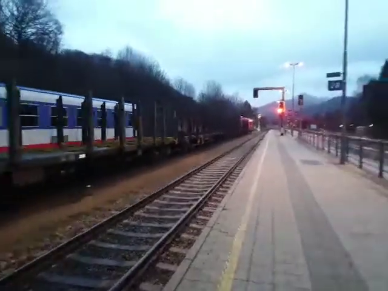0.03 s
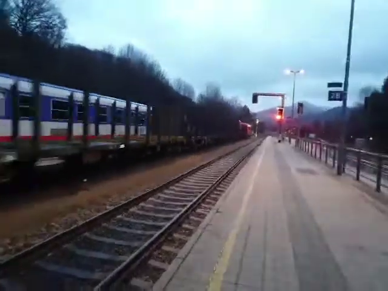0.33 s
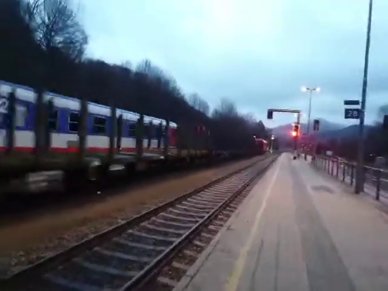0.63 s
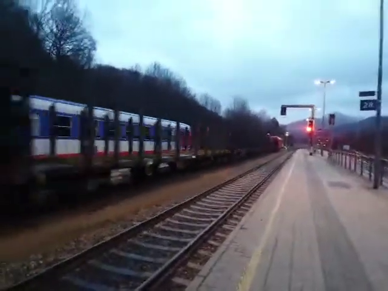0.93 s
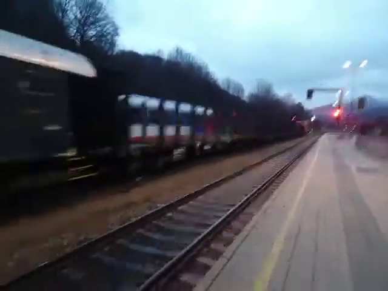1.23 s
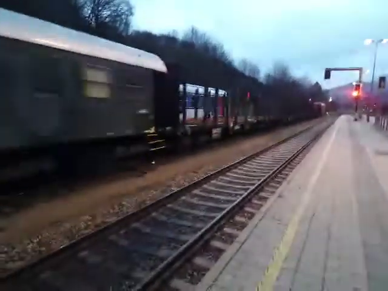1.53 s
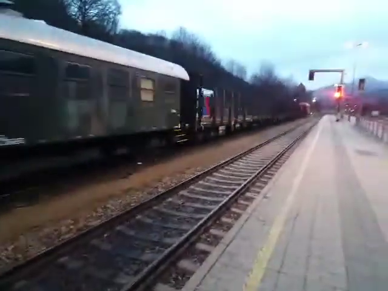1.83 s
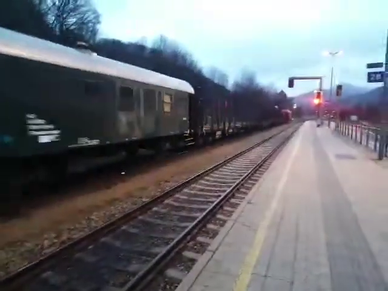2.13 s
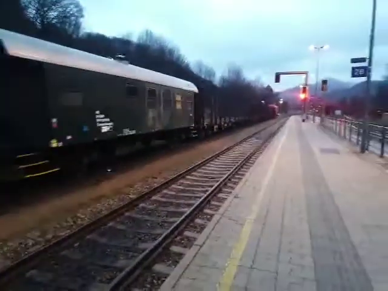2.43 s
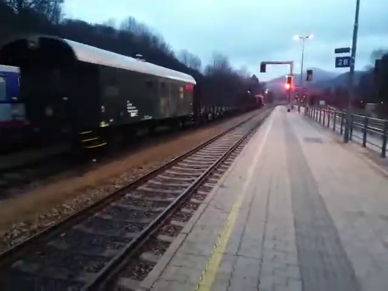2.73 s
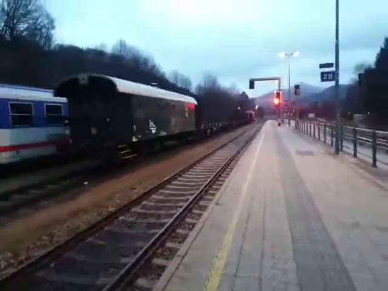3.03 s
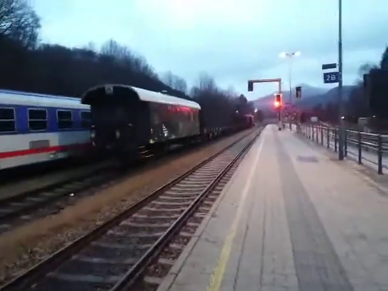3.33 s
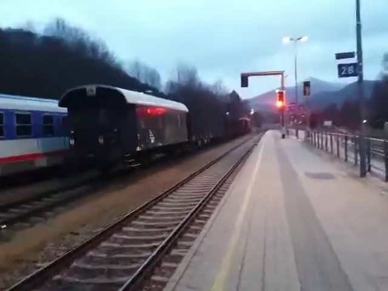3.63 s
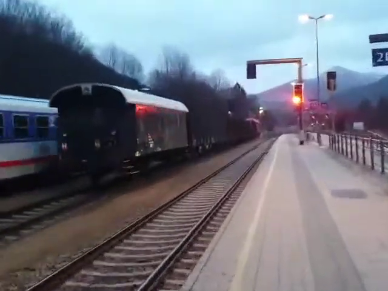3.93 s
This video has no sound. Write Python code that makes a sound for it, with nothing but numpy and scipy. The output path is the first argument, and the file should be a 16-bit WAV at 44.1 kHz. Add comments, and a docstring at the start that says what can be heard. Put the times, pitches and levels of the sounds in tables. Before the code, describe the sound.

A freight train rolls by and away, rumbling, clacking and squeaking lightly.

```python
"""A station platform, two tracks from a freight train whose last wagons roll past the microphone and away.
The wagon bodies rumble, wheels and rails hiss and ring under the rolling contact, and a flat spot
thumps about three times a second. The jolts shake loose steel fittings; now and then a flange squeaks
or a tread scrapes. The closing van's wheels ring out last, and light air moves on the microphone."""
import sys
import numpy as np
from scipy import signal
from scipy.fft import rfft, irfft
from scipy.io import wavfile
from scipy.ndimage import map_coordinates

SR = 44100
rng = np.random.default_rng(int(sys.argv[2]) if len(sys.argv) > 2 else 0)


def digitize_waveform(pressure):
    """Quantize a signal to 16-bit integers and store it at the path in sys.argv[1].

    Rows of a 2-D input are taken as channels; values are limited to [-1, 1].
    """
    field = np.atleast_2d(pressure).T
    bounded = np.clip(field, -1, 1)
    quanta = np.round(bounded * 32767).astype(np.int16)
    wavfile.write(sys.argv[1], SR, quanta)


N = 176400
T = np.arange(N) / SR


def from_db(db):
    """Decibels to gain."""
    return 10 ** (np.asarray(db) / 20)


def rms_one(x):
    """Scale to unit power."""
    return x / np.sqrt(np.mean(x ** 2) + 1e-20)


def level(rows):
    """Gain over time from (t/s, level/dB) points."""
    return from_db(np.interp(T, *np.transpose(rows)))


def coloured(x, spectrum):
    """Shape a steady signal by (f/Hz, level/dB) points; unit power."""
    hz, db = np.transpose(spectrum)
    f = np.maximum(np.fft.rfftfreq(N, 1 / SR), 1)
    gain = from_db(np.interp(np.log(f), np.log(hz), db)) / (1 + (f / hz[-1] / 2) ** 2)
    return rms_one(irfft(rfft(x) * gain, N))


def noise(spectrum):
    """Coloured noise of unit power."""
    return coloured(rng.standard_normal(N), spectrum)


def drift(rate_hz):
    """Slow random wander of spread 1."""
    f = np.fft.rfftfreq(N, 1 / SR)
    return rms_one(irfft(rfft(rng.standard_normal(N)) / (1 + (f / rate_hz) ** 2), N))


def clicks_at(times, db):
    """One click at each time."""
    clicks = np.zeros(N)
    clicks[(times * SR).astype(int)] = from_db(db)
    return clicks


def swell(peak_s, rise_s, fall_s):
    """Exponential rise to a peak, then an exponential fall."""
    return np.exp(-np.abs(T - peak_s) / np.where(T < peak_s, rise_s, fall_s))


def ring(x, hz, t60):
    """One mode: a unit click leaves a dying sine of height 1."""
    radius = from_db(-60 / (t60 * SR))
    angle = 2 * np.pi * min(hz, .45 * SR) / SR
    return signal.lfilter([0, np.sin(angle)], [1, -2 * radius * np.cos(angle), radius ** 2], x + 1e-18)


def sing(hz, width_hz):
    """A resonance kept ringing by rough contact; unit power."""
    t60 = np.log(1000) / (np.pi * width_hz)
    return rms_one(ring(ring(rng.standard_normal(N), hz, t60), hz, t60 / 10))


def ringing(modes, waver_db):
    """Modes kept ringing by the rolling, each wavering on its own; unit power."""
    return rms_one(sum(from_db(db + waver_db * drift(13)) * sing(hz, width) for hz, width, db in modes))


# spectrum of the air on the microphone (f/Hz, relative level/dB)
AIR_SPECTRUM = [(20, -4), (60, 14), (130, -19), (400, -44)]
def breeze():
    """Light air on the microphone: a faint low flutter, different on each side."""
    return from_db(-45) * np.array([noise(AIR_SPECTRUM) for _ in range(2)])


# spectrum of the rumble underfoot (f/Hz, relative level/dB)
GROUND_SPECTRUM = [(20, -24), (38, -14), (52, 2.5), (70, -10.5), (100, -2), (130, -7.5), (170, -19),
                   (400, -60)]
def ground_rumble(start_db=-31, fade_db_per_s=2.93):
    """The whole train's deep rumble carries far through the ground, fading slowly."""
    return from_db(start_db - fade_db_per_s * T) * noise(GROUND_SPECTRUM)


# rumble of the wagon bodies, two tracks off (f/Hz, relative level/dB) and its course (t/s, level/dB)
RUMBLE_SPECTRUM = [(20, -37), (38, -28), (52, -2.5), (70, 7), (90, 0.5), (128, -1), (165, 4), (222, 1),
                   (275, -4.5), (330, -6), (460, -16), (610, -18), (780, -21), (950, -26.5), (1300, -26.5),
                   (2500, -40.5)]
RUMBLE_COURSE = [(0, -25), (.6, -23.5), (1.0, -23), (1.4, -26.5), (1.95, -29.5), (2.2, -28), (2.6, -28.5),
                 (3.2, -30.5), (4, -31.5)]
def wagon_rumble(uneven_db=2.36):
    """Wagon bodies shaken by uneven track."""
    return level(RUMBLE_COURSE) * noise(RUMBLE_SPECTRUM) * from_db(uneven_db * drift(14))


# hollow modes of the bodies (f/Hz, width/Hz, relative level/dB) and their course (t/s, level/dB)
DRONE_MODES = [(165.8, 10, -6), (210.5, 19.8, -1.5), (330, 105, -19), (607, 31, -18.5)]
DRONE_COURSE = [(0, -28.5), (1.0, -42.5), (1.5, -28.5), (2.199, -32), (2.8, -34), (4, -48)]
def wagon_drone():
    """Rolling keeps the hollow bodies droning."""
    return level(DRONE_COURSE) * ringing(DRONE_MODES, waver_db=1.0)


# steel rolling on steel (f/Hz, relative level/dB), fading down the line (t/s, level/dB)
HISS_SPECTRUM = [(400, 8.5), (1100, 1.5), (1800, -2), (2400, 2), (3400, -3.5), (4500, -5.5), (5300, -10.5),
                 (6600, -12), (7900, -24.5), (13500, -22.5), (16000, -34)]
HISS_COURSE = [(0, -35.5), (.55, -32.5), (1.1, -35.5), (1.45, -38), (1.95, -37.5), (2.3, -41), (2.8, -43.5),
               (3.4, -45), (4, -49.5)]
def rolling_hiss(uneven_db=1.1):
    """The fine roughness of wheel and rail hisses."""
    return level(HISS_COURSE) * noise(HISS_SPECTRUM) * from_db(uneven_db * drift(7.7))


# flat wagons' wheel modes (f/Hz, width/Hz, relative level/dB) as they pass (t/s, level/dB)
WAGON_WHEEL_MODES = [(1618, 38, 6), (2060, 94, 4.5), (2300, 123, 9), (2410, 80, 6.5), (4056, 67, -8.5),
                     (4680, 90, -5), (6170, 500, -4)]
WAGON_WHEEL_COURSE = [(0, -40.5), (.6, -38), (1.3, -41), (2.1, -46.5), (2.7, -47), (4, -48.5)]
def wagon_wheels():
    """The flat wagons' wheels ring under the rolling contact."""
    return level(WAGON_WHEEL_COURSE) * ringing(WAGON_WHEEL_MODES, waver_db=3.0)


# blows from the flat spot and rail joints (t/s, boom level/dB, clack level/dB)
WHEEL_BLOWS = [(0.179, -3, -18), (0.277, -10, -31.5), (.501, -3.5, -20.5), (.522, -12, -33.5),
               (.633, -8, -26), (0.824, -6, -21), (.835, -3.5, -23.5), (1.024, -19.5, -29),
               (1.143, -10.5, -24), (1.178, -12, -35), (1.268, -15.5, -41), (1.350, -9.5, -29),
               (1.46, -13, -30.5), (1.49, -23, -26.5), (1.779, -18, -25), (2.091, -13.5, -29),
               (2.143, -9, -29.5), (2.17, -14, -55), (2.39, -16, -27), (2.712, -32, -32),
               (3.328, -19, -29.5), (3.403, -17, -39), (3.639, -34, -32), (3.927, -24, -36)]
# low modes of a struck wagon (f/Hz, t60/s, relative level/dB)
BOOM_MODES = [(80.3, 0.37, -15.5), (184.8, 0.074, -3.5), (212.5, 0.056, -8), (365, 0.031, -24.5),
              (559.3, 0.012, -18)]
def booms(build_t60=0.065):
    """Each blow swings the wagon's low modes up within a cycle or two."""
    times, db, _ = np.transpose(WHEEL_BLOWS)
    blows = clicks_at(times, db)
    out = 0
    for hz, t60, mode_db in BOOM_MODES:
        swing = ring(ring(blows, hz, t60), hz, build_t60)
        out += swing / np.abs(swing).max() * blows.max() * from_db(mode_db)
    return out


# spectrum of a wheel hitting the rail (f/Hz, relative level/dB)
CLACK_SPECTRUM = [(90, -51), (200, 2.5), (380, 2.5), (460, -10), (580, -4), (800, -7), (1000, -11),
                  (1600, -15), (3000, -29.5), (8000, -44)]
def clacks(rise_s=0.011, fall_s=0.037):
    """The harder part of each blow: a short crunch of rail, sleepers and running gear."""
    force = sum(from_db(db) * swell(t + rise_s, rise_s, fall_s) for t, _, db in WHEEL_BLOWS)
    return force * noise(CLACK_SPECTRUM)


# sharp metal knocks (t/s, level/dB) and the running gear's modes (f/Hz, t60/s, relative level/dB)
GEAR_KNOCKS = [(.183, -29), (.507, -26), (.828, -23.5), (2.148, -31), (2.459, -25)]
GEAR_MODES = [(386, 0.014, -4), (636, 0.029, 6.5), (695, 0.011, 13), (1050, 0.023, -6.5),
              (1630, 0.043, -6.5), (2430, .03, -19), (4600, 0.031, -19), (6640, .03, -28)]
# spectrum of steel fittings, cracking here and rattling below (f/Hz, relative level/dB)
FITTING_SPECTRUM = [(800, -15), (1800, 9), (2600, 2), (3300, 5), (4500, 4), (6500, 3.5), (8000, -14.5),
                    (10500, -12), (16000, -74)]
def knocks(bounce_s=0.0071, bounce_db=-8.5, crack_s=0.021, crack_db=-15):
    """Slack running gear hits its stops with a crack and bounces once."""
    times, db = np.transpose(GEAR_KNOCKS)
    bounce_times = times + bounce_s * rng.uniform(.7, 1.3, len(times))
    hits = clicks_at(times, db) + clicks_at(bounce_times, db + bounce_db)
    decay = signal.lfilter([1], [1, -np.exp(-1 / (crack_s * SR))], hits + 1e-18)
    crack = from_db(crack_db) * decay * noise(FITTING_SPECTRUM)
    return crack + sum((-1) ** k * from_db(mode_db) * ring(hits, hz, t60)
                       for k, (hz, t60, mode_db) in enumerate(GEAR_MODES))


# hard touches on the rims (t/s, level/dB) and the rims' high modes (f/Hz, t60/s, relative level/dB)
RIM_TOUCHES = [(0.185, -36), (0.211, -37), (.56, -49), (0.833, -40), (.893, -38), (1.814, -45.5),
               (2.462, -62), (2.505, -43.5), (3.09, -57), (3.334, -46)]
RIM_MODES = [(2570, .18, -2), (2715, .25, 0), (3795, .07, -1), (3960, .1, -1), (4527, .22, -4),
             (4673, .16, -4), (5030, .2, -7), (6050, .12, -10), (6310, .18, -11)]
def clangs(spread_db=2):
    """Each hard touch strikes every rim mode with a strength of its own."""
    times, db = np.transpose(RIM_TOUCHES)
    chance_db = spread_db * rng.standard_normal((len(times), len(RIM_MODES)))
    return sum((-1) ** k * ring(clicks_at(times, db + mode_db + chance_db[:, k]), hz, t60)
               for k, (hz, t60, mode_db) in enumerate(RIM_MODES))


# flurries of loose fittings (peak t/s, level/dB, fall/s)
FLURRIES = [(0.188, -30.5, 0.035), (.232, -32.5, 0.083), (.555, -35.5, 0.047), (.68, -40.5, 0.021),
            (.845, -41, 0.054), (0.899, -33.5, 0.055), (1.074, -57, 0.023), (1.16, -46.5, 0.061),
            (1.235, -42, 0.042), (1.36, -43, 0.075), (1.53, -40, 0.052), (1.818, -35, 0.065),
            (2.095, -48, 0.032), (2.16, -39, 0.031), (2.43, -45, 0.025), (2.505, -37.5, 0.029),
            (2.76, -43, 0.068), (3.096, -41, 0.029), (3.34, -45.5, 0.063), (3.42, -43.5, 0.03),
            (3.65, -49.5, 0.23), (3.97, -44.5, 0.075)]
# their sizzle (f/Hz, relative level/dB), lost with distance (t/s, level/dB against the rattle)
SIZZLE_SPECTRUM = [(5000, -20), (8000, -1.5), (10000, -0.5), (12300, 5.5), (14200, 8), (16000, -32)]
SIZZLE_COURSE = [(0, -9), (.6, -21), (1.15, -12.5), (1.8, -18.5), (2.4, -29), (4, -37)]
def rattles(parts=80, touches_per_s=3500, spread_db=3.5, rise_s=0.033):
    """Flurries of small touches between stakes, chains and couplings, each part with its own pitch."""
    touches = (rng.random(N) < touches_per_s / SR) * rng.choice([-1, 1], N)
    touches = touches * from_db(spread_db * np.minimum(rng.exponential(1, N), 4))
    part_hit = rng.integers(0, parts, N)
    pitches_hz = np.linspace(1400, 15000, parts) + rng.uniform(-51, 88, parts)
    pings = sum(ring(touches * (part_hit == k), hz, t60=0.015) for k, hz in enumerate(pitches_hz))
    clatter = rms_one(pings) + from_db(-18.5) * rms_one(touches)
    sizzle = level(SIZZLE_COURSE) * coloured(clatter, SIZZLE_SPECTRUM)
    shaking = np.sqrt(sum((from_db(db) * swell(t, rise_s, fall)) ** 2 for t, db, fall in FLURRIES))
    return shaking * (coloured(clatter, FITTING_SPECTRUM) + sizzle)


# flange squeaks (middle t/s, length/s, f/Hz, level/dB)
FLANGE_SQUEAKS = [(.235, .05, 4522, -39), (1.08, .09, 2020, -43), (1.25, 0.065, 4975, -40.5),
                  (1.412, 0.05, 5890, -44), (1.835, 0.06, 4970, -41), (2.512, 0.035, 3714, -41),
                  (3.335, 0.07, 2340, -40)]
def squeaks():
    """A flange rubs the rail and one wheel mode sings briefly, a clear, slightly unsteady tone."""
    waver_hz, flutter_db = 45 * drift(52.2), 2.5 * drift(80)
    out = 0
    for t, length, hz, db in FLANGE_SQUEAKS:
        envelope = from_db(db + flutter_db) * np.exp(-(2 * (T - t) / length) ** 2)
        out += envelope * np.sin(2 * np.pi * np.cumsum(hz + waver_hz) / SR)
    return out


# scrapes along the rail (peak t/s, rise/s, fall/s, f/Hz, width/Hz, level/dB)
TREAD_SLIPS = [(.86, 0.04, 0.068, 2686, 130, -32), (1.88, 0.19, 0.22, 2840, 300, -42),
               (1.96, 0.34, 0.38, 2170, 260, -39)]
def scrapes(uneven_db=3.5):
    """Wheel treads slip sideways on the rail head, gripping unevenly."""
    grip = from_db(uneven_db * drift(25))
    return grip * sum(from_db(db) * swell(t, rise, fall) * sing(hz, width)
                      for t, rise, fall, hz, width, db in TREAD_SLIPS)


# close, beating modes of the van's discs (f/Hz, width/Hz, relative level/dB) in passing (t/s, level/dB)
DISC_MODES = [(1447, 24, -2), (1511, 40, -6.5), (1577, 60, 1)]
DISC_COURSE = [(0, -60), (1.3, -45), (1.6, -40.5), (2.2, -39.5), (2.8, -42.5), (3.1, -43.5), (3.45, -43),
               (3.6, -48), (4, -48)]
def van_discs(throb_hz=9.5, throb_db=1.5, peak_s=2.745):
    """The van's wheel discs throb a few times a turn; their ring reaches the microphone from all round."""
    throb = from_db(throb_db * np.cos(2 * np.pi * throb_hz * (T - peak_s)))
    sides = np.array([ringing(DISC_MODES, waver_db=4.0) for _ in range(2)])
    return level(DISC_COURSE) * throb * sides


# the van's wheel modes (f/Hz, width/Hz, relative level/dB) as it passes (t/s, level/dB)
VAN_WHEEL_MODES = [(796, 74, -4.5), (2380, 160, -6), (2420, 80, -11), (2934, 140, -11), (3730, 200, -8.5)]
VAN_WHEEL_COURSE = [(0, -65), (1.3, -55), (1.6, -45.5), (2.0, -42), (2.8, -51), (3.4, -46), (4, -47.5)]
def van_wheels():
    """The closing van's wheels ring on the rail as it draws past the platform."""
    return level(VAN_WHEEL_COURSE) * ringing(VAN_WHEEL_MODES, waver_db=5.5)


# full lead of the microphone's left side over its right as the train draws ahead (t/s, lead/ms)
LEFT_LEAD = [(0, 0.52), (1.8, 0.46), (2.5, 0.39), (3.2, 0.376), (4, 0.39)]
def yard(x, wet_db, left_db, lead_share=1, t60=0.08, side_gap_s=0.00047):
    """Direct sound, reaching the left side first, plus scatter from platform, ballast and wagons."""
    delay_s = lead_share * np.interp(T, *np.transpose(LEFT_LEAD)) / 1000
    direct = np.array([x, map_coordinates(x, [(T - delay_s) * SR], order=3)])
    t = T[:SR // 2]
    # long waves reach both sides nearly alike
    alike = 0.88 * np.sinc(2 * np.fft.rfftfreq(len(t), 1 / SR) * side_gap_s)
    mid, side = rfft(rng.standard_normal((2, len(t))))
    diffuse = irfft(np.sqrt(1 + alike) * mid + np.sqrt(1 - alike) * side * [[1], [-1]], len(t))
    low_cut = signal.butter(2, 340, "high", fs=SR, output="sos")  # the scatter carries only sound above about 340 Hz
    tail = signal.sosfilt(low_cut, diffuse * from_db(-60 * t / t60))
    scatter = signal.fftconvolve(x[None], rms_one(tail) / np.sqrt(len(t)), axes=1)[:, :N]
    wet = from_db(wet_db)
    balance = from_db([[left_db / 2], [-left_db / 2]])
    return balance * (direct + wet * scatter) / np.hypot(1, wet)


def scene():
    """The train from a stereo microphone on the platform, two tracks off."""
    bodies = ground_rumble() + wagon_rumble() + wagon_drone()
    wheels = wagon_wheels() + scrapes() + squeaks()
    return (breeze() + van_discs()
            + yard(bodies, wet_db=-10.5, left_db=1.07, lead_share=0.403)
            + yard(booms(), wet_db=-8, left_db=1.07, lead_share=0.11)
            + yard(clacks() + knocks(), wet_db=-8, left_db=1.07, lead_share=0.71)
            + yard(rolling_hiss(), wet_db=-0.5, left_db=-2, lead_share=0.871)
            + yard(van_wheels(), wet_db=6, left_db=1.0, lead_share=0.95)
            + yard(wheels + rattles() + clangs(), wet_db=-0.5, left_db=-2))


def record(dry):
    """The microphone loses the deepest bass; the top is cut steeply."""
    low_cut = signal.butter(2, 50, "high", fs=SR, output="sos")
    high_cut = signal.ellip(12, .1, 90, 15400, fs=SR, output="sos")
    return signal.sosfilt(high_cut, signal.sosfilt(low_cut, dry))


dry = scene()
out = record(dry)
digitize_waveform(out)
```